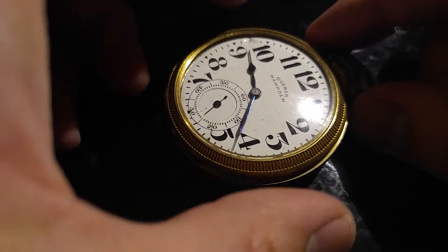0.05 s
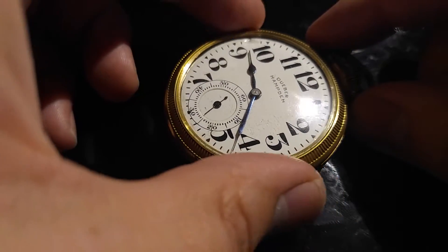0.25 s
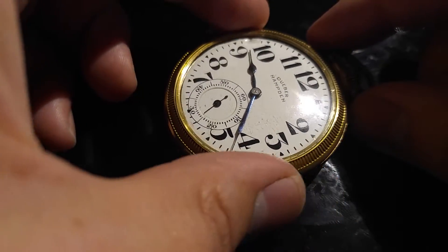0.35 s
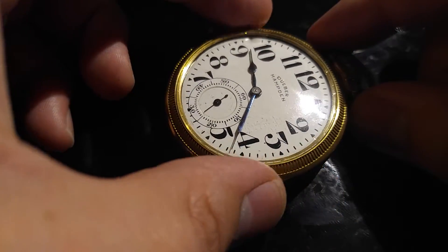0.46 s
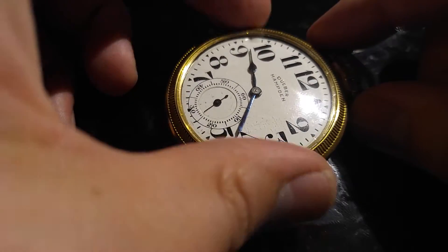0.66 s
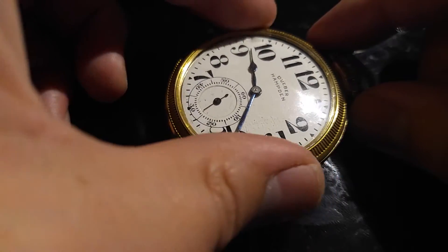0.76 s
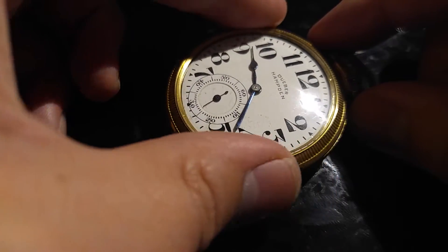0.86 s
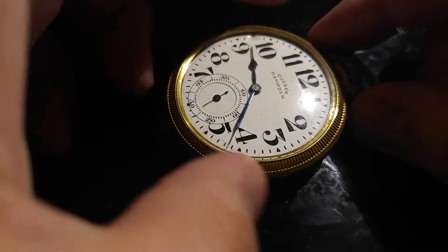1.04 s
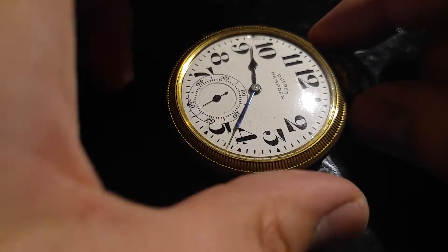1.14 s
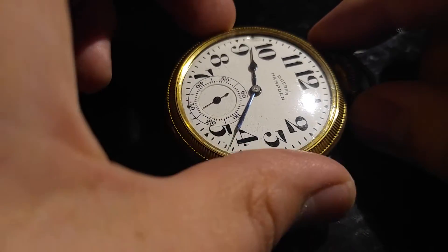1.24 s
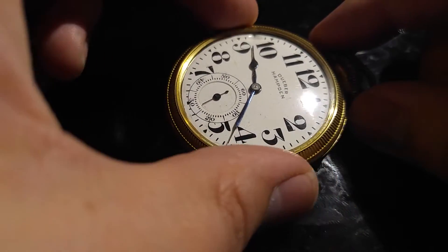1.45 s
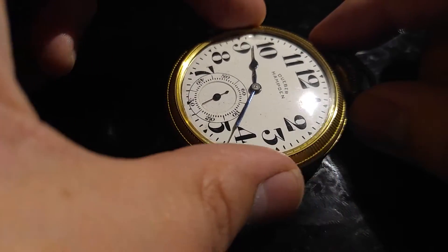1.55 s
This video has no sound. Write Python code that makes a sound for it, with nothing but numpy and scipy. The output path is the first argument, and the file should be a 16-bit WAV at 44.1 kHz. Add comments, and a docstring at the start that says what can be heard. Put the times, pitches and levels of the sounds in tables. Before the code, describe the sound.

A metal pocket watch is handled close by, a knock fading right at the start. Its case snaps brightly at about 0.25 seconds, followed by a tiny tick and two hollow knocks between 0.3 and 0.4 seconds. A lighter click comes at 0.8. From 1 second on, only faint finger rubs and soft bumps remain. The small room adds a short echo and a faint hum.

```python
"""Fingers handle a metal pocket watch close by, in a small room with a faint hum.
The low ring of a knock is fading as the sound begins. A quarter of a second in, the case snaps brightly.
A loose part ticks and a few knocks follow. Each hard contact is a hollow thud, a low ring, a gritty
crack and a short scrape that rings the case. Skin rubs on the rim in between, and from about one second
on only rubs and soft fingertip bumps are left. The room answers each sound with a short echo."""
import sys
import numpy as np
from scipy import signal
from scipy.fft import rfft, irfft, next_fast_len
from scipy.io import wavfile

SR = 44100
rng = np.random.default_rng(int(sys.argv[2]) if len(sys.argv) > 2 else 0)


def unload_audio(sound):
    """Save the sound as a 16-bit wav file, at the path given as the first command line argument."""
    columns = np.transpose(np.atleast_2d(sound))
    # keep every value between -1 and 1, then stretch to whole-number steps
    steps = np.round(np.clip(columns, -1, 1) * 32767)
    wavfile.write(sys.argv[1], SR, steps.astype(np.int16))


N = 70560
LEAD_IN = 4410  # extra samples before t = 0, so a sound can already be ringing at the start
TIME = np.arange(-LEAD_IN, N) / SR

# tone of the room's steady noise: f/Hz, level/dB
NOISE_TONE = [(25, -7), (60, -11), (110, -6.5), (200, -2), (330, -4.5), (550, -3), (1000, -10),
              (2000, -11.5), (5000, -20.5), (10000, -18), (15000, -23)]
# how alike left and right are in the room: f/Hz, likeness (1 = the same)
STEREO_LIKENESS = [(50, .6), (140, .9), (500, .75), (1200, 0.1), (3000, .1), (12000, 0.077)]
# snap and knocks (more tilt is brighter): t/s, thud level/dB, thud tilt/(dB per octave), body level/dB,
# case level/dB, case tilt/(dB per octave), crack level/dB, crack tilt/(dB per octave), scrape time/s
HARD_CONTACTS = [ (-0.0120, -21, 1, -31, -37, -3.5, -35, -2, 0.00091),
                 (0.2432, -55, -2, -29, -19, 0, -34, 0, .0025),
                 (0.246, -27.5, 2, -31.5, -26.5, 0.5, -25, 6, 0.0024),
                 (0.3214, -37.5, 0, -56, -63, -3.5, -57, -4, 0.0011),
                 (0.3547, -20.5, 4, -39, -39, 1, -33.5, 4, 0.0022),
                 (0.4184, -17.5, -4.5, -31.5, -63.5, -7.5, -48.5, -9, 0.0017),
                 (0.7777, -27.5, 1, -43, -45.5, -1, -43.5, 0, 0.0014),
                 (0.7985, -57.5, -3, -70.5, -61, 1, -56, 2.5, .001)]
# tone of the hollow thud: f/Hz, level/dB
THUD_TONE = [(60, -35), (170, -33), (230, -19.5), (320, -12), (380, -12), (490, 2.5), (700, 0.5), (870, -3),
             (1100, -15.5), (1400, -28), (3000, -39), (12000, -69)]
# long, low notes of the watch and its support: f/Hz, level/dB, t60/s (time to fade by 60 dB)
BODY_NOTES = [(315, -12.5, 0.14), (412, -8, 0.12), (497.4, -1, 0.12), (1139, -9.5, .12)]
# short, high notes of the metal case: f/Hz, level/dB, t60/s
CASE_NOTES = [(1634, -16.5, 0.011), (2620, -3, 0.021), (3120, -10.5, 0.015), (4468, -22.5, .012),
              (5590, -14.5, 0.0097), (7206, -8.5, .02), (8680, -2, .013), (9580, -11.5, 0.01435),
              (10550, -14, .014), (11406, -5, 0.033), (11560, -3, 0.029), (13500, -19, .01),
              (14450, -15.5, .012), (15190, -16.5, .012)]
# tone of the gritty crack: f/Hz, level/dB
CRACK_TONE = [(60, -18), (160, -16.5), (270, -2.5), (1000, -7), (2500, 8.5), (4200, 2), (7000, 0),
              (9500, 5.5), (11500, 4.5), (13000, -8.5), (15200, -6), (16500, -16)]
# how long the room rings on: f/Hz, t60/s
ROOM_FADE = [(200, 0.15), (600, 0.22), (2000, .25), (6000, 0.11), (14000, .13)]
# tone of that ringing: f/Hz, level/dB
ROOM_TONE = [(100, -18.5), (330, -8), (600, -12), (1400, -14), (2500, -17), (6000, -11), (11000, -23.5),
             (15000, -19)]
# echoes off nearby surfaces: delay/s, level/dB
NEAR_ECHOES = [(0.0096, -20), (.0225, -27)]
# tone of those echoes: f/Hz, level/dB
ECHO_TONE = [(300, -4.5), (1500, -7.5), (7000, -7.5), (11700, 3.5), (14000, -6.5)]
# soft bumps of the fingertips: t/s, level/dB, tilt/(dB per octave)
FINGER_BUMPS = [(0.2055, -64, 14), (0.5665, -55.5, -3.5), (0.5812, -45.5, -12.5), (0.9885, -54, 6.5),
                (1.0765, -53, -4.5), (1.0835, -45, -4.5), (1.1005, -48.5, -11), (1.3145, -57, -1),
                (1.3865, -54, 3), (1.3925, -55.5, -1), (1.4365, -45, 0.5), (1.4445, -53.5, -3),
                (1.5412, -47, -14), (1.5460, -52.5, -12.5)]
# skin sliding on the rim: peak t/s, rise/s, fall/s, dull level/dB, gritty level/dB
SKIN_RUBS = [(0.241, 0.0065, 0.0031, -48.5, -45), (0.320, 0.019, 0.0068, -45.5, -76),
             (0.352, 0.0062, 0.012, -41.5, -39), (0.414, 0.0065, 0.0037, -40, -46),
             (0.575, 0.013, 0.011, -57.5, -71.5), (0.995, .022, 0.062, -58, -65.5),
             (1.075, 0.024, 0.025, -53.5, -53.5), (1.22, 0.033, .02, -69.5, -88),
             (1.288, 0.009, 0.014, -65, -80), (1.388, 0.014, .014, -56.5, -73.5),
             (1.438, 0.007, .02, -63.5, -62.5), (1.485, 0.036, 0.024, -60.5, -78.5),
             (1.569, .025, 0.023, -61, -74)]
# tone of a rub's dull part: f/Hz, level/dB
DULL_TONE = [(100, -29.5), (300, -20.5), (480, 4), (800, 1), (1200, -11.5), (2000, -27.5), (8000, -48)]
# tone of a rub's gritty part: f/Hz, level/dB
GRIT_TONE = [(300, -18), (1100, -1.5), (1700, -2), (2500, 7), (3500, -13), (7000, -22.5), (16000, -26.5)]
# notes of a small loose part: f/Hz, level/dB, t60/s
TICK_NOTES = [(3680, 1, 0.016), (3420, -10, .012)]

TILT_START_HZ, TILT_PIVOT_HZ = 497, 8100  # a tilt is flat below the start and 0 dB at the pivot
THUD_PAN_DB, BODY_PAN_DB, CASE_PAN_DB, CRACK_PAN_DB, RUB_PAN_DB = 5.5, 4, 5.5, 7.5, 3.5


def from_db(db):
    """Turn decibels into a number to multiply by."""
    return 10 ** (np.asarray(db) / 20)


def rms_one(x):
    """Scale a sound so its average level (rms) is 1."""
    return x / np.sqrt(np.mean(x ** 2) + 1e-30)


def unit_hit(x, window_s=.005):
    """Give a hit the same energy as a level of 1 held for window_s."""
    return x * np.sqrt(window_s * SR / (np.sum(x ** 2) + 1e-30))


def at_hz(points, hz):
    """Read a table between its rows, with octaves evenly spaced."""
    freqs, values = np.transpose(points)
    return np.interp(np.log(np.maximum(hz, 1)), np.log(freqs), values)


def colour(x, tone, tilt_db=0):
    """Filter a sound to the given tone; the tilt makes it brighter or duller."""
    size = 2 * next_fast_len(x.shape[-1])
    hz = np.fft.rfftfreq(size, 1 / SR)
    octaves = np.log2(np.maximum(hz, TILT_START_HZ) / TILT_PIVOT_HZ)
    gain = from_db(at_hz(tone, hz) + tilt_db * octaves)
    # minimum phase: the filter never sounds ahead of the hit
    cepstrum = irfft(np.log(gain))
    cepstrum[1:size // 2] *= 2
    cepstrum[size // 2 + 1:] = 0
    return irfft(rfft(x, size) * np.exp(rfft(cepstrum)))[..., :x.shape[-1]]


def ring(x, hz, t60):
    """Let x set one fading note ringing."""
    decay, angle = from_db(-60 / (t60 * SR)), 2 * np.pi * hz / SR
    return signal.lfilter([1, 0, -1], [1, -2 * decay * np.cos(angle), decay * decay], x + 1e-18)


def struck(x, notes, tilt_db=0):
    """An object struck by x rings with several notes, each at its own level."""
    return sum(from_db(db + tilt_db * np.log2(hz / TILT_PIVOT_HZ)) * unit_hit(ring(x, hz, t60))
               for hz, db, t60 in notes)


def pan(x, db, lag_s=.00017):
    """Place a sound to the left: louder there, later on the right."""
    n = np.arange(len(x))
    left = x * from_db(db / 2)
    right = np.interp(n - lag_s * SR, n, x) * from_db(-db / 2)
    return np.array([left, right]) / np.sqrt(np.cosh(db * np.log(10) / 10))  # keep the overall power


def add(out, s, sound):
    """Mix a stereo sound in at s seconds."""
    start = LEAD_IN + int(s * SR)
    part = out[:, start:start + sound.shape[1]]
    part += sound[:, :part.shape[1]]


def wide_noise(size):
    """Stereo hiss whose two sides are alike in the bass and almost unrelated in the treble."""
    mid, side = rfft(rng.standard_normal((2, size)))
    alike = at_hz(STEREO_LIKENESS, np.fft.rfftfreq(size, 1 / SR))
    shared = np.sqrt((1 + alike) / 2) * mid
    opposite = np.sqrt((1 - alike) / 2) * side * [[1], [-1]]
    return irfft(shared + opposite, size)


def background(noise_db=-70.5, hum_db=-80.5, hum_hz=137.46):
    """Steady room noise and a low hum that wavers because it is a narrow band of noise."""
    hum = rng.standard_normal(len(TIME))
    for _ in range(2):
        hum = ring(hum, hum_hz, t60=np.log(1000) / (2 * np.pi * 9))  # passes about 9 Hz either side
    noise = colour(wide_noise(len(TIME)), NOISE_TONE)
    return from_db(noise_db) * rms_one(noise) + from_db(hum_db) * rms_one(hum)


def thud(db, tilt_db):
    """The hollow knock of the held watch, which dies away quickly."""
    knock = colour(-signal.unit_impulse(SR // 5), THUD_TONE, tilt_db)
    return pan(from_db(db) * unit_hit(knock), THUD_PAN_DB)


def snap_and_knocks():
    """Each hard contact thuds and rings the body; its brief scrape rings the case and makes a crack."""
    t = np.arange(SR // 5) / SR
    body_ring = struck(signal.unit_impulse(len(t)), BODY_NOTES)
    out = np.zeros((2, len(TIME)))
    for (s, thud_db, thud_tilt, body_db, case_db, case_tilt,
         crack_db, crack_tilt, scrape_s) in HARD_CONTACTS:
        swell = np.sqrt(t / scrape_s) * np.exp(-(t / scrape_s) ** 2)
        scrape = rng.standard_normal(len(t)) * swell
        case_ring = struck(scrape, CASE_NOTES, case_tilt)
        crack = colour(unit_hit(scrape), CRACK_TONE, crack_tilt)
        add(out, s, thud(thud_db, thud_tilt))
        add(out, s, pan(from_db(body_db) * body_ring, BODY_PAN_DB))
        add(out, s, pan(from_db(case_db) * case_ring, CASE_PAN_DB))
        add(out, s, pan(from_db(crack_db) * crack, CRACK_PAN_DB))
    return out


def room_echo(x, build_s=.005):
    """The room sends back two near echoes and a soft wash of sound whose treble dies first."""
    t = np.arange(SR // 2) / SR
    hz = np.fft.rfftfreq(len(t), 1 / SR)
    spectrum = rfft(wide_noise(len(t))) * from_db(at_hz(ROOM_TONE, hz))
    wash, echoes = 0, np.zeros(len(t))
    for band_hz, t60 in ROOM_FADE:
        band = at_hz([(f, float(f == band_hz)) for f, _ in ROOM_FADE], hz)  # 1 here, 0 at other rows
        fade = from_db(-60 * t / t60) * (1 - np.exp(-(t / build_s) ** 2))
        wash = wash + irfft(spectrum * band, len(t)) * fade / np.sqrt(np.sum(fade ** 2))
    for delay_s, db in NEAR_ECHOES:
        echoes[int(delay_s * SR)] += from_db(db)
    response = wash + colour(echoes, ECHO_TONE)
    left = x[:1]
    return signal.fftconvolve(left, response, axes=1)[:, :len(TIME)] / np.sqrt(2)


def fingertip_bumps():
    """Soft fingertips make the watch thud without ringing it."""
    out = np.zeros((2, len(TIME)))
    for s, db, tilt_db in FINGER_BUMPS:
        add(out, s, thud(db, tilt_db))
    return out


def skin_slips(tone, slips_per_s=3600, spread_db=3.5):
    """Sliding skin makes many tiny slips of uneven size, which blur into a rustle."""
    n = len(TIME)
    sizes = from_db(spread_db * np.minimum(rng.exponential(1, n), 4))
    signs = rng.choice([-1, 1], n)
    slipping = rng.random(n) < slips_per_s / SR
    return rms_one(colour(sizes * signs * slipping, tone))


def rim_rubs():
    """The rustle swells and dies with each slide of a finger on the rim."""
    dull, grit = 0, 0
    for s, rise_s, fall_s, dull_db, grit_db in SKIN_RUBS:
        swell = np.exp(-np.maximum((s - TIME) / rise_s, (TIME - s) / fall_s))
        dull = dull + from_db(dull_db) * swell
        grit = grit + from_db(grit_db) * swell
    return pan(dull * skin_slips(DULL_TONE) + grit * skin_slips(GRIT_TONE), RUB_PAN_DB)


def loose_part_tick(at_s=0.3208, db=-41.5):
    """A small loose part is tapped once and rings with two short notes."""
    out = np.zeros((2, len(TIME)))
    tick = struck(signal.unit_impulse(SR // 5), TICK_NOTES)
    add(out, at_s, pan(from_db(db) * tick, CASE_PAN_DB))
    return out


def scene():
    """The watch in the hands, the room's echo and the background together."""
    watch = snap_and_knocks() + fingertip_bumps() + rim_rubs() + loose_part_tick()
    return (watch + room_echo(watch) + background())[:, LEAD_IN:]


def record(dry, cutoff_hz=16300):
    """Cut away the very highest treble with a steep filter."""
    return signal.sosfilt(signal.ellip(10, .1, 80, cutoff_hz, fs=SR, output="sos"), dry)


dry = scene()
out = record(dry)
unload_audio(out)
```